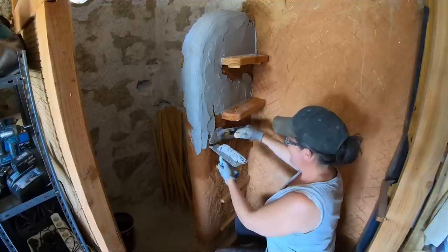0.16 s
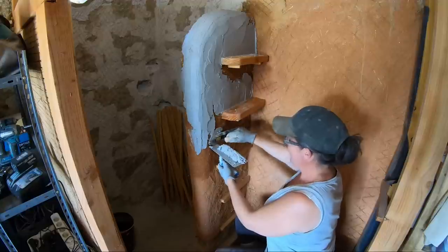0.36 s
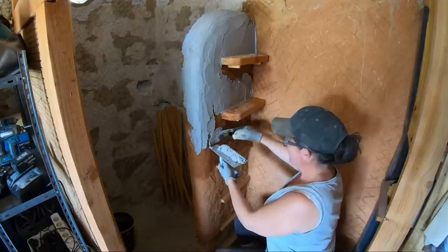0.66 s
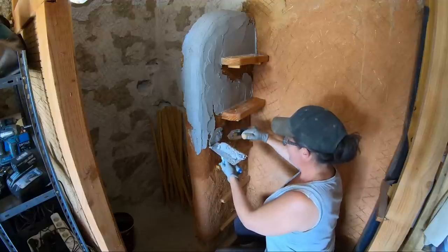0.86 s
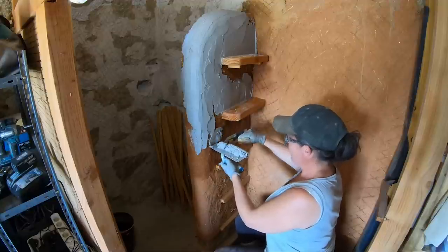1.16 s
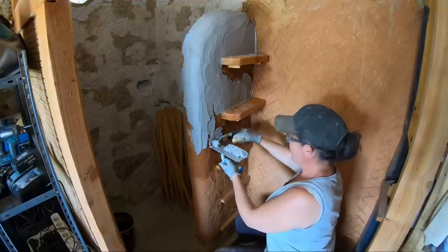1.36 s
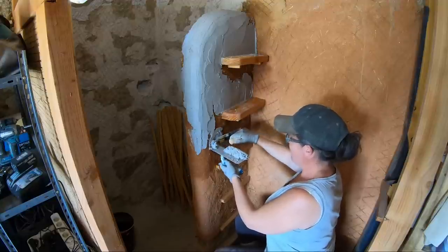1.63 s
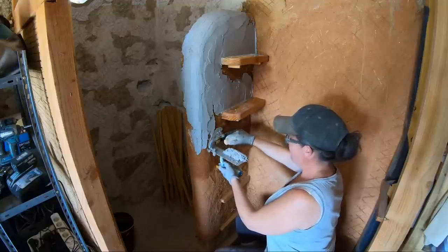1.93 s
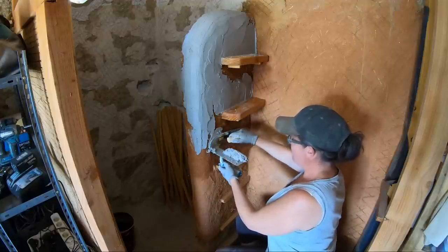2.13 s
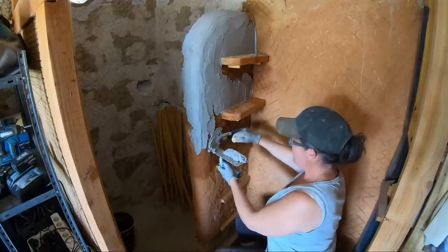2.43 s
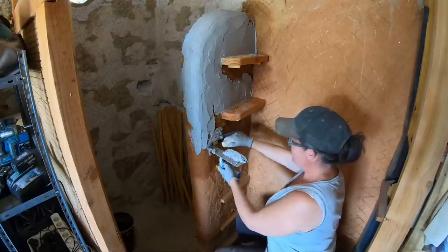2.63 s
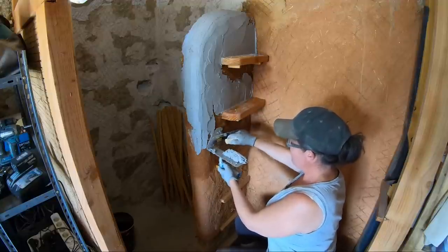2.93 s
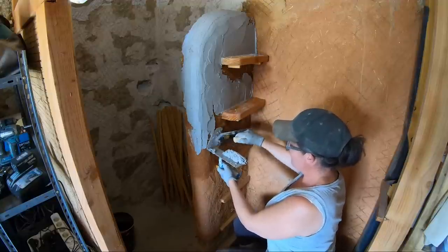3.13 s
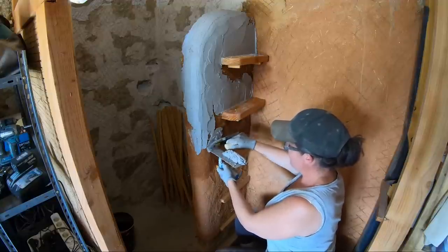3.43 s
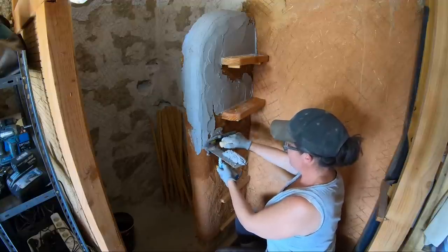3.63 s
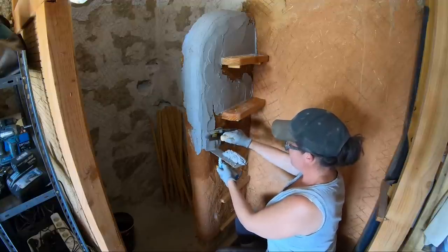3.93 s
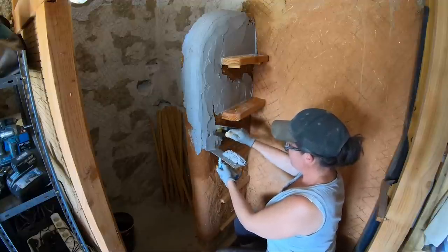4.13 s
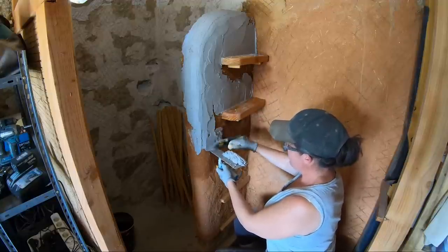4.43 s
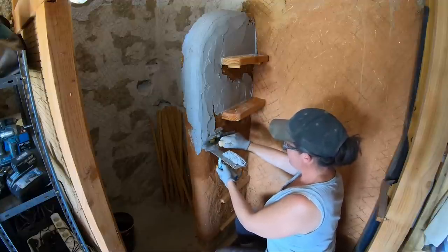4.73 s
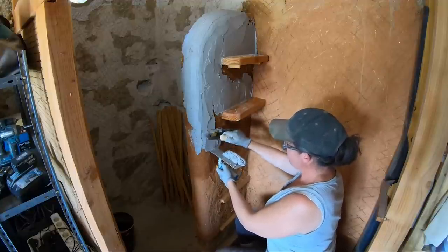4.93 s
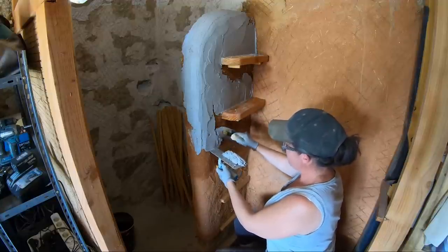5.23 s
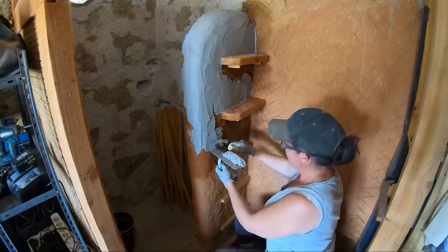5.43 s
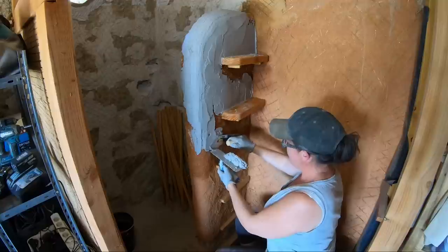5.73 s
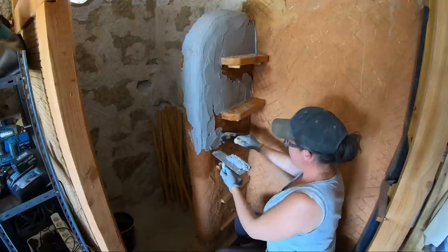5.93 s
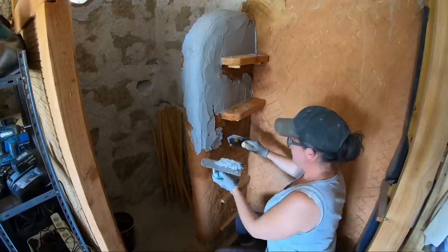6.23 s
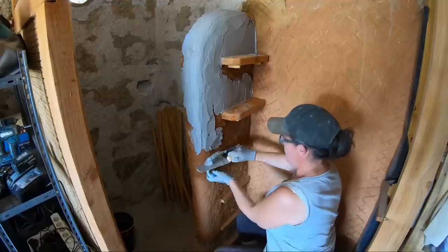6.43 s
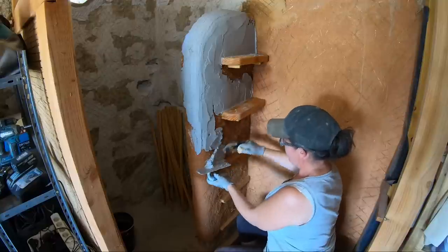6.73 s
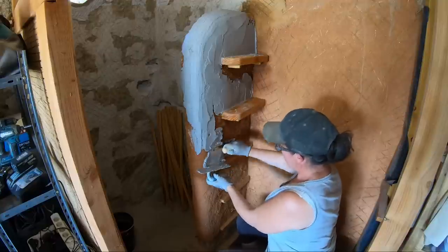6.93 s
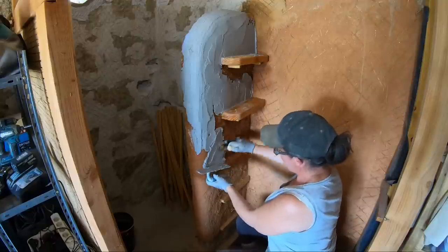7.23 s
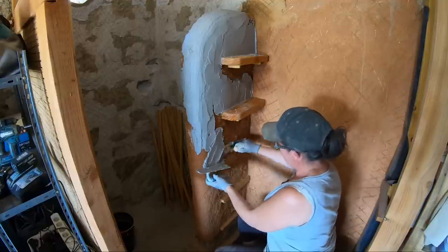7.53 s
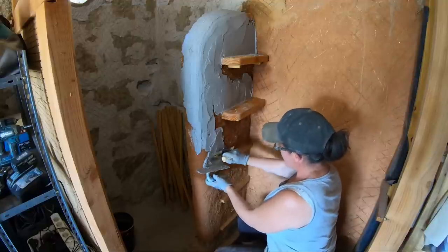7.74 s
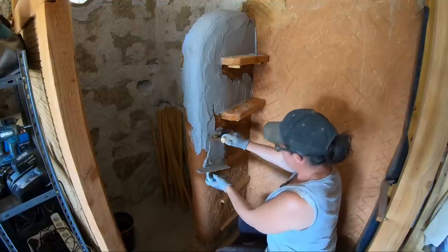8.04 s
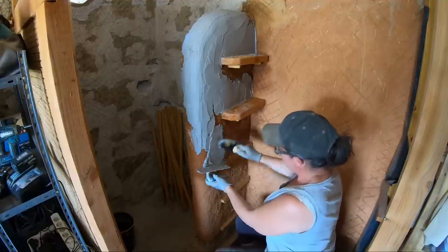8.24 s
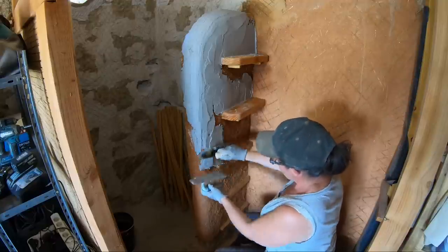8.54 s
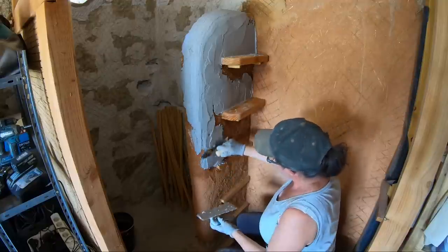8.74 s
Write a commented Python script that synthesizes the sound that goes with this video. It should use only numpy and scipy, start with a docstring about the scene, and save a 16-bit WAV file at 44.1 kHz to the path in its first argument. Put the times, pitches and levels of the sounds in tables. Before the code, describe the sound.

A gritty hiss is already under way as a steel trowel drags wet, sandy render over a wall in a small stone room, close and in stereo. From 0.4 to 2.4 s, moderate swipes follow one another with small crunches, a sharper one near 1.3 s. After a small gap, a dull bump and crunch at 2.5-2.6 s start another stroke; harder bites come at 3.4 s, soft bumps at 3.1 and 4.15 s. The strongest rasp hits at 4.5 s and trails to 5.3 s, then a heavy crunch at 5.5 s leads a swipe to 6.1 s. Flicks end in brief falling rings, with a short tail and low room air. At 6.33 s everything turns thin, bright and dry, with faint steady tones. Short scratches follow at 6.5, 6.9, 7.2 and 7.5-7.7 s, a longer light scrape until 8.3 s, then quick dabs and tiny knocks to the end.

```python
"""A gritty hiss already under way, then a crunch: a steel trowel works wet render onto a wall in a small stone room.
Random sand grains excite the blade's resonances: the sliding flat hisses and drags, the biting edge crunches.
Air pockets under the blade ring and glide; later come bumps of the tool and small soft knocks.
Heard in stereo: direct sound, a moving echo off the wall just behind the blade, close scatter, a short tail and room air.
From 6.33 s the whole sound is thin, bright and dry, with faint steady tones."""
import sys
import numpy as np
from scipy import signal
from scipy.fft import rfft, irfft
from scipy.io import wavfile
from scipy.ndimage import map_coordinates

SR = 44100
rng = np.random.default_rng(int(sys.argv[2]) if len(sys.argv) > 2 else 0)


def unload_audio(sound):
    """Save the sound as a 16-bit wav file, at the path given as the first command line argument."""
    columns = np.transpose(np.atleast_2d(sound))
    # keep every value between -1 and 1, then stretch to whole-number steps
    steps = np.round(np.clip(columns, -1, 1) * 32767)
    wavfile.write(sys.argv[1], SR, steps.astype(np.int16))


N = 391166
TIME = np.arange(N) / SR


def from_db(db):
    """Decibels to gain."""
    return 10 ** (np.asarray(db) / 20)


def rms_one(x):
    """Scale to unit rms."""
    return x / np.sqrt(np.mean(x ** 2) + 1e-20)


def through(x, response):
    """Pass a signal through an impulse response."""
    return signal.fftconvolve(x, response)[:N]


def butter(x, hz, kind):
    """Second-order low- or high-pass."""
    sos = signal.butter(2, min(hz, SR / 2 - 100), kind, fs=SR, output="sos")
    return signal.sosfilt(sos, x)


def curve_filter(points, size=2048):
    """Causal (minimum-phase) response shaped by (Hz, dB) points, scaled to unit energy."""
    hz, db = np.transpose(points)
    grid = np.maximum(np.arange(size // 2 + 1) * SR / size, 1)
    curve_db = np.interp(np.log(grid), np.log(hz), db)
    # fold the cepstrum onto positive times: this gives minimum phase
    cepstrum = irfft(np.log(from_db(curve_db)))
    cepstrum[1:size // 2] *= 2
    cepstrum[size // 2 + 1:] = 0
    response = irfft(np.exp(rfft(cepstrum)))
    return response / np.linalg.norm(response)


def drift(rate):
    """Slow chance with spread 1, from random knots at a rate per second."""
    knots = rng.standard_normal(int(N / SR * rate) + 2)
    return rms_one(np.interp(TIME * rate, np.arange(len(knots)), knots))


# room air, warm then bright; columns: f/Hz, relative level/dB per Hz
AIR_WARM = [(20, -6.5), (45, -6.5), (100, -13), (170, 4.5), (230, -1.5), (330, -6), (550, -12), (800, -4),
            (1100, -13), (3200, -20), (5000, -18), (9000, -31), (16000, -54)]
AIR_BRIGHT = [(20, -4), (70, -8.5), (190, -3.5), (340, -8), (450, -12), (560, -18), (740, 4.5), (950, 2.5),
              (1300, -3.5), (2500, -8.5), (3800, -4), (5500, -10.5), (16000, -19)]
AIR_WARM_DB, AIR_BRIGHT_DB = -74.5, -76.5


def air(spectrum, width):
    """Steady room background at the microphones: shaped noise with a shared part and an opposed part."""
    mid, side = (through(rng.standard_normal(N), curve_filter(spectrum, size=8192)) for _ in range(2))
    return mid + width * side * np.array([[1], [-1]])


# the blade slides over the render and ends in a flick of the wrist; levels before colouring
# columns: touch t/s, lift t/s, hiss level at touch/dB, hiss level at lift/dB,
#          flick length/s, flick level/dB, low drag against hiss/dB
STROKES = [(-.05, 0.191, -53.5, -59.5, 0.081, 5, -11), (0.369, .775, -54, -61, 0.086, 5, -13.5),
           (1.034, 1.437, -57, -52.5, 0.19, 6, -39), (1.462, 1.762, -61, -58, 0.083, -4.5, -6),
           (1.763, 2.366, -55.5, -57.5, 0.063, -1, -12.5), (2.61, 3.171, -61.5, -57, 0.43, 2, -17),
           (3.383, 3.937, -49.5, -51.5, 0.089, 3, -15), (3.937, 4.264, -60, -48.5, 0.19, 2, -21.5),
           (4.479, 5.265, -48.5, -55, 0.12, 8, -17), (5.47, 6.069, -65.5, -57, 0.42, 5.5, -17),
           (6.472, 6.784, -58.5, -55, 0.048, 7.5, -22.5), (6.865, 7.12, -57, -49, 0.018, 0.5, -27),
           (7.213, 7.365, -56.5, -55.5, 0.025, 7.5, -26), (7.47, 7.543, -59, -59, 0.023, 10, -33),
           (7.576, 7.658, -51.5, -56.5, 0.018, 13, -21), (7.763, 8.3, -59, -62, 0.039, 14.5, -23),
           (8.402, 8.489, -53.5, -53.5, 0.045, 3.5, -21.5), (8.57, 8.654, -58.5, -55.5, 0.05, 1.5, -21),
           (8.727, 8.873, -55.5, -58.5, .1, 4.5, -27)]
TOUCH_S = 0.039   # the blade settles onto the render
LIFT_S = 0.011   # time constant of losing contact
WAVER_DB, WAVER_PER_S = 1.8, 14   # unsteadiness of the hand


def pressure():
    """Hiss and drag gains: each stroke makes contact, leans in or eases off evenly, swells in the flick and lets go."""
    hiss, low = np.zeros(N), np.zeros(N)
    for touch, lift, touch_db, lift_db, flick_s, flick_db, drag_db in STROKES:
        span = slice(max(int((touch - TOUCH_S) * SR), 0), int((lift + 10 * LIFT_S) * SR))
        t = TIME[span]
        settling = np.clip((t - touch) / TOUCH_S + .5, 0, 1) ** 2
        contact = settling * np.exp(-np.maximum(t - lift, 0) / LIFT_S)
        flick = np.sin(np.pi * np.clip((lift - t) / flick_s, 0, 1))
        lean_db = np.interp(t, [touch, lift], [touch_db, lift_db])
        gain = contact * from_db(lean_db + flick_db * flick)
        hiss[span] += gain
        low[span] += gain * from_db(drag_db)
    waver = from_db(WAVER_DB * drift(WAVER_PER_S))
    return hiss * waver, low * waver


def drag_at(s):
    """Low drag against hiss (dB) of the stroke under way, or nearest, at a given moment."""
    return min(STROKES, key=lambda stroke: max(stroke[0] - s, s - stroke[1]))[-1]


def grit(per_s, spread_db, hiss):
    """Sand grains snap under the edge at random, a few far harder than the rest, over the hiss of fine paste."""
    hardness_db = spread_db * np.minimum(rng.exponential(1, N), 4)
    sizes = from_db(hardness_db) * rng.choice([-1, 1], N)
    snaps = sizes * (rng.random(N) < per_s / SR)
    return rms_one(rms_one(snaps) + hiss * rng.standard_normal(N))


# resonances of the steel blade; columns: f/Hz, width/Hz, relative level/dB
BLADE = [(865, 31, -5.5), (1745, 21, 2), (2170, 140, -1), (2287, 56, 1), (2680, 8, -1.5), (2905, 34, 3),
         (3570, 110, -3), (3860, 28, -12.5), (4500, 59, -16.5), (6240, 190, 0.5), (9100, 33, -21),
         (11050, 110, -3)]


def blade(force, ring_db):
    """The blade passes the scraping on and adds its own damped resonances."""
    out = force.copy()
    for hz, width_hz, db in BLADE:
        r = np.exp(-np.pi * width_hz / SR)   # pole radius
        poles = [1, -2 * r * np.cos(2 * np.pi * hz / SR), r * r]
        band = signal.lfilter([1, 0, -1], poles, force + 1e-18)
        out += from_db(db + ring_db) * (1 - r * r) / 2 * band
    return out


def smear(push, judder_db=0.73):
    """The flat of the blade slides on; the pressure wavers and now and then a coarse grain cracks."""
    force = push * from_db(judder_db * drift(70))
    coarse = from_db(-11) * grit(per_s=160, spread_db=3.0, hiss=0)
    fine = grit(per_s=7000, spread_db=3.0, hiss=0.61)
    return blade(force * (fine + coarse), ring_db=-16.0)


def drag(push, low_hz=650, high_hz=1400):
    """Coarser grains roll under the blade, lower in pitch."""
    grains = grit(per_s=2200, spread_db=0.0, hiss=.5)
    rolling = butter(butter(grains, low_hz, "high"), high_hz, "low")
    return push * rms_one(butter(rolling, low_hz, "high"))


# as the blade lifts, the gap under it opens and its ring falls; level against lift hiss plus flick
LIFT_FROM_HZ, LIFT_TO_HZ, LIFT_RING_S, LIFT_RING_DB = 3080, 2217, .1, -10.5


def lift_rings(overhang_s=0.029):
    """Every stroke ends in the same falling ring, as strong as its flick."""
    rings = []
    for _, lift, _, lift_db, _, flick_db, _ in STROKES:
        start = lift + overhang_s - LIFT_RING_S
        level_db = lift_db + flick_db + LIFT_RING_DB
        rings.append((start, LIFT_RING_S, LIFT_FROM_HZ, LIFT_TO_HZ, level_db))
    return rings


# the edge bites into sand; the more it crushes, the more low body and fine sizzle; levels before colouring
# columns: t/s, rise/s, t60/s, level/dB, crush level/dB
BITES = [(.23, .0024, 0.17, -56.5, -23), (.371, .0065, .12, -49.5, 4), (.964, .002, 0.037, -67.5, 8),
         (1.055, 0.014, 0.1, -53.5, 3), (1.268, .002, 0.31, -48.5, 8.5), (1.33, .002, 0.18, -38, 8),
         (1.375, 0.019, 0.39, -58, 13.5), (1.436, .001, 0.12, -48, 10.5), (1.486, .003, 0.11, -53, 9),
         (1.578, .008, 0.091, -48, -8), (1.638, 0.0041, 0.14, -50.5, -6), (1.765, .012, 0.082, -57, 6),
         (2.516, .0011, 0.19, -62, 19), (2.606, .018, 0.21, -37.5, 6.5), (3.109, 0.001, 0.093, -43.5, 6.5),
         (3.15, 0.002, 0.16, -45, -13), (3.383, 0.0026, 0.24, -36.5, 2.5), (3.431, .018, 0.52, -39, 2),
         (4.146, 0.00083, .16, -48.5, 22), (4.186, .006, 0.13, -52, -6), (4.461, 0.00062, 0.14, -46.5, 12),
         (4.5, 0.0062, 0.083, -29.5, -8), (4.538, .015, 0.12, -29.5, -26),
         (4.591, 0.0063, 0.28, -46.5, 10.5), (4.938, 0.0067, 0.16, -47.5, 4),
         (5.079, 0.0027, 0.064, -48.5, 3), (5.46, 0.0014, 0.16, -39, 5), (5.489, 0.028, 0.45, -32, -15),
         (5.53, 0.022, 0.08, -36.5, -5), (5.561, 0.0027, 0.077, -35, 8.5), (5.6, .01, 0.067, -55.5, 18.5),
         (6.474, .0043, 0.082, -35.5, -4.5), (6.487, 0.0084, 0.13, -33.5, -6),
         (6.717, 0.002, .033, -40.5, -13), (6.86, 0.001, 0.07, -35, -18), (7.062, 0.0077, 0.044, -55.5, 12),
         (7.204, 0.0012, 0.032, -27, -4), (7.215, 0.0077, 0.03, -32, -3.5),
         (7.464, 0.012, 0.09, -40, -13.5), (7.612, 0.019, 0.054, -42.5, 11),
         (7.708, 0.0019, 0.075, -27.5, -5), (7.726, 0.0031, 0.039, -30, 8),
         (7.842, 0.0065, 0.025, -58.5, 2), (7.998, 0.017, 0.089, -49.5, 2), (8.341, .003, .034, -66, 5),
         (8.383, 0.0033, 0.08, -42, 4), (8.527, 0.0017, 0.026, -58, -1), (8.56, .002, 0.047, -36, 0),
         (8.565, 0.0043, 0.033, -36.5, 2), (8.78, .008, 0.089, -61.5, 14.5)]
BODY_DB, SIZZLE_DB = 0.5, 1.5   # low body and fine sizzle of a hard bite
HARD_BITE_DB, BODY_LOSS = -34, 1   # a softer crush hardly moves the wall: dB of body lost per dB below a hard one
FLAT_DRAG_DB, BODY_FOLLOWS_DRAG = -16.5, 0.78   # drag of a flat blade; held on edge, its bites lose body too


def bites(events, judder_db=1.5, low_hz=130, body_hz=1400, sizzle_hz=6500):
    """Short crunches: force builds as the edge digs in, then lets go."""
    sand = grit(per_s=4500, spread_db=3.0, hiss=0.31) * from_db(judder_db * drift(220))
    body = butter(butter(sand, low_hz, "high"), body_hz, "low")
    middle = -butter(butter(sand, body_hz, "high"), sizzle_hz, "low")
    sizzle = butter(sand, sizzle_hz, "high")
    out = np.zeros(N)
    for s, rise, t60, db, crush_db in events:
        span = slice(int(s * SR), int((s + rise + t60) * SR))
        age = TIME[span] - TIME[span][0]
        force = np.minimum(age / rise, 1) * from_db(-60 * np.maximum(age - rise, 0) / t60)
        body_db = BODY_DB - BODY_LOSS * max(HARD_BITE_DB - db - crush_db, 0)
        body_db += BODY_FOLLOWS_DRAG * min(drag_at(s) - FLAT_DRAG_DB, 0)
        crushed = from_db(body_db) * body[span] + from_db(SIZZLE_DB) * sizzle[span]
        out[span] += from_db(db) * force * (middle[span] + from_db(crush_db) * crushed)
    return blade(out, ring_db=-1.5)


# small catches on lumps of sand while the blade slides; level against the hiss
CATCHES_PER_S, CATCH_RISE_S, CATCH_T60_S, CATCH_DB, CATCH_CRUSH_DB = 4, 0.002, 0.1, -2.5, 7.5


def catches(push):
    """Small bites at random moments of the strokes, as strong as the blade is pressed."""
    moments = np.flatnonzero((rng.random(N) < CATCHES_PER_S / SR) & (push > 0))
    levels_db = 20 * np.log10(push[moments]) + CATCH_DB
    return [(s, CATCH_RISE_S, CATCH_T60_S, db, CATCH_CRUSH_DB) for s, db in zip(TIME[moments], levels_db)]


# under a hard push the scrape rings, likely in the gap between blade and wall
# columns: t/s, length/s, from f/Hz, to f/Hz, level/dB before the room
GAPS = [(1.116, 0.14, 2940, 3020, -57.5), (1.266, 0.053, 3080, 3250, -45.5),
        (1.332, 0.025, 2450, 2950, -46.5), (1.567, 0.15, 2470, 1680, -62), (1.7, 0.079, 1070, 800, -65.5),
        (2.615, 0.03, 1840, 1560, -43.5), (2.624, .07, 1200, 1360, -54.5), (3.382, 0.037, 784, 844, -48),
        (3.432, 0.048, 840, 860, -47.5), (3.754, 0.19, 3260, 2700, -56.5), (4.46, 0.12, 1445, 1970, -47.5),
        (4.53, 0.132, 597, 660, -55.5), (4.593, 0.062, 1550, 910, -52.5), (5.195, .07, 2320, 1570, -53.5),
        (5.463, 0.08, 3330, 3370, -42.5), (5.56, .063, 906, 650, -60.5), (7.213, .021, 3550, 2900, -46),
        (7.472, 0.019, 2780, 2700, -52)]


def gaps(events, width_share=.06):
    """Grit excites the pocket of air under the blade, a resonance that glides with the size of the gap."""
    out, sand = np.zeros(N), grit(per_s=3000, spread_db=1.0, hiss=0.38)
    for s, length, from_hz, to_hz, db in events:
        span = slice(int(s * SR), int((s + length) * SR))
        progress = np.linspace(0, 1, len(TIME[span]))
        glide_hz = from_hz * (to_hz / from_hz) ** progress
        phasor = np.exp(2j * np.pi * np.cumsum(glide_hz) / SR)
        r = np.exp(-np.pi * width_share * from_hz / SR)
        # shift the glide to zero frequency, resonate there, and shift back
        ringing = (signal.lfilter([1], [1, -r], sand[span] / phasor) * phasor).real
        ringing = butter(butter(ringing, 0.68 * from_hz, "high"), 1.64 * from_hz, "low")
        out[span] += from_db(db) * signal.windows.tukey(len(progress), .5) * rms_one(ringing)
    return out


def wall_echo(x, echo_db, mean_s, travel):
    """The wall right behind the blade sends a reflection whose delay moves with the hand, so the colour keeps shifting."""
    delay_s = mean_s * np.exp(travel * drift(2))
    return x + from_db(echo_db) * map_coordinates(x, [np.arange(N) - delay_s * SR], order=3)


# colours of smear and bite, warm then bright; columns: f/Hz, relative level/dB per Hz
SMEAR_WARM = [(300, -41.5), (700, -18), (1200, -12.5), (1700, -4.5), (2150, -3), (3100, 2), (3900, -1),
              (5200, -5.5), (6300, -4.5), (7300, -10), (9400, -12), (11200, -26), (14500, -38.5),
              (16000, -46)]
BITE_WARM = [(120, -25.5), (300, -11), (650, -3.5), (1200, -3), (1750, -1.5), (2300, -0.5), (3400, 3),
             (4300, -3), (6400, -10.5), (7400, -12), (9400, -16.5), (11300, -31), (14500, -38),
             (16000, -49)]
SMEAR_BRIGHT = [(1000, -47), (2300, -31.5), (3100, -14), (3900, -10), (5500, -8), (9000, -3), (12500, 1),
                (15800, 1)]
BITE_BRIGHT = [(300, -45), (600, -17.5), (1100, -11.5), (2600, -10), (3050, 0), (5500, -0.5), (7500, 1.5),
               (9000, 6), (11300, 4.5), (13000, 6.5), (15800, 1.5)]


def coloured(sides, spectrum):
    """Filter both sides to the same colour."""
    return np.array([through(x, curve_filter(spectrum)) for x in sides])


# where the tool is heard, warm then bright; columns: f/Hz, left minus right level/dB before scaling to unit energy
BALANCE_WARM = [(200, 4), (700, 4.5), (1400, -3), (2800, -2.1), (4500, 2), (6500, 9.5), (9000, -11),
                (15000, 4)]
BALANCE_BRIGHT = [(1000, 0), (3000, -7), (5500, -6), (9000, -9), (14000, -6)]


def room(x, balance, near_db, near_t60, tail_db, tail_t60, wall_hz):
    """Direct sound, sideways scatter from close surfaces, and a short, duller tail whose lows both sides share."""
    age, sides = TIME[:SR // 2], []
    scatter = rng.standard_normal(len(age)) * from_db(-60 * age / near_t60) * (age > .0005)
    near = butter(scatter, 800, "high")
    near /= np.linalg.norm(near)
    shared = butter(rng.standard_normal(len(age)), 500, "low")
    for sign in (1, -1):   # left, right
        own = butter(rng.standard_normal(len(age)), 600, "high")
        decay = from_db(-60 * age / tail_t60) * (age > .004)
        tail = butter((shared + own) * decay, wall_hz, "low")
        tail /= np.linalg.norm(tail)
        response = sign * from_db(near_db) * near + from_db(tail_db) * tail
        response[0] += 1   # direct sound
        facing = curve_filter([(hz, sign * db / 2) for hz, db in balance])
        sides.append(through(x[len(sides)], signal.fftconvolve(response, facing)))
    return np.array(sides)


# the tool bumps the wall; columns: t/s, relative level/dB
BUMPS = [(2.52, -42), (2.653, -49), (3.112, -35), (4.148, -33.5)]
# the tool in the hand, when bumped; columns: f/Hz, relative level/dB, t60/s
BUMP_MODES = [(156, -6.5, 0.066), (177, 2, 0.047), (216, 4, 0.04), (284.6, -5.5, 0.072), (334.5, -8, 0.12),
              (407, -12, 0.084), (527, -16, 0.024), (660, -10.5, 0.068), (908, -12, 0.045)]
# small soft knocks, likely crumbs of mortar landing; columns: t/s, relative level/dB
CRUMBS = [(6.88, -41), (7.583, -35.5), (7.74, -36), (8.676, -43), (8.688, -40), (8.729, -47.5)]
# modes rung by those small knocks; columns: f/Hz, relative level/dB, t60/s
CRUMB_MODES = [(867, -7, 0.032), (976, -2, 0.011), (1120, 1, 0.018), (1375, -6, 0.036), (1840, -6, 0.016),
               (2700, -11, 0.013), (4230, -3, 0.0087)]


def knocks(events, modes, low_hz, contact_hz):
    """Soft contacts ring a set of damped modes, a little differently each time; a small body radiates no deep bass."""
    out, age = np.zeros(N), TIME[:SR // 2]
    hz, mode_db, t60 = np.transpose(modes)[:, :, None]
    signs = (-1) ** np.arange(len(modes))[:, None]
    rings = signs * np.sin(2 * np.pi * hz * age) * np.exp(-np.log(1000) * age / t60)
    for s, db in events:
        part = out[int(s * SR):][:len(age)]   # a view: adding to it adds to out
        gains = from_db(db + mode_db + rng.standard_normal(hz.shape))
        part += (gains * rings).sum(0)[:len(part)]
    softened = butter(out + 1e-18, contact_hz, "low")
    return butter(butter(softened, low_hz, "high"), low_hz, "high")


# faint steady tones in the bright part; columns: f/Hz, rms level/dB
HUM = [(452, -97), (899, -87.5), (1120, -91.5), (1502, -91.5)]


def hum():
    """Thin steady tones, each a pure sine."""
    return sum(from_db(db) * np.sqrt(2) * np.sin(2 * np.pi * hz * TIME) for hz, db in HUM)


TURN_S = 6.33   # middle of the turn from warm to bright


def scene():
    """The same work throughout, first warm and roomy, then bright and dry."""
    push, low_push = pressure()
    slide = smear(push) + gaps(lift_rings(), width_share=0.17)
    crunch = bites(list(BITES) + catches(push))
    # each side catches the wall's reflection over a path of its own
    sliding = [wall_echo(slide, echo_db=-9, mean_s=.0011, travel=.3) for _ in range(2)]
    crunching = [wall_echo(crunch, echo_db=-9, mean_s=.0011, travel=.3) for _ in range(2)]

    bumps = knocks(BUMPS, BUMP_MODES, low_hz=139, contact_hz=1320)
    crumbs = from_db(-7) * knocks(CRUMBS, CRUMB_MODES, low_hz=680, contact_hz=5130)
    body = bumps + crumbs + from_db(-5.5) * drag(low_push) + gaps(GAPS)

    warm = from_db(-2.5) * coloured(sliding, SMEAR_WARM) + from_db(-5.0) * coloured(crunching, BITE_WARM)
    bright = from_db(-1.0) * coloured(sliding, SMEAR_BRIGHT) + from_db(-1.5) * coloured(crunching, BITE_BRIGHT)
    warm = room(warm + body, BALANCE_WARM, near_db=-6.0, near_t60=0.0064,
                tail_db=-12.0, tail_t60=0.2, wall_hz=4700)
    bright = room(bright + body, BALANCE_BRIGHT, near_db=-5.0, near_t60=0.0033,
                  tail_db=-13, tail_t60=0.039, wall_hz=9050)
    warm = warm + from_db(AIR_WARM_DB) * air(AIR_WARM, width=1.0)
    bright = bright + from_db(AIR_BRIGHT_DB) * air(AIR_BRIGHT, width=1.0) + hum()

    turn = np.clip((TIME - TURN_S) / 0.011 + .5, 0, 1)   # an 11 ms crossfade
    return (1 - turn) * warm + turn * bright


CUTOFF_HZ = 15950


def record(dry):
    """The top is cut steeply by an elliptic low-pass."""
    return signal.sosfilt(signal.ellip(10, .1, 80, CUTOFF_HZ, fs=SR, output="sos"), dry)


dry = scene()
out = record(dry)
unload_audio(out)
```